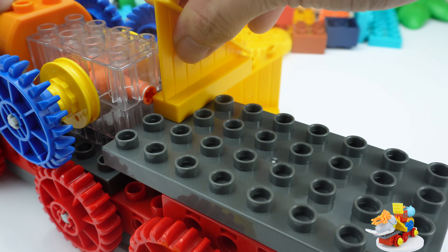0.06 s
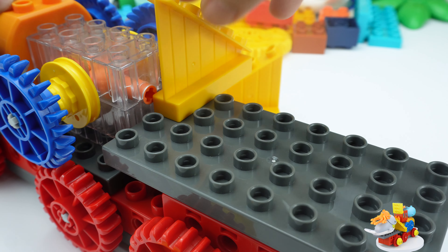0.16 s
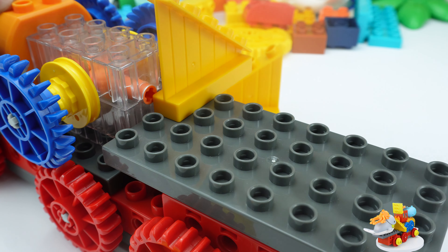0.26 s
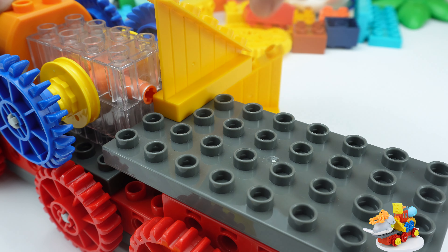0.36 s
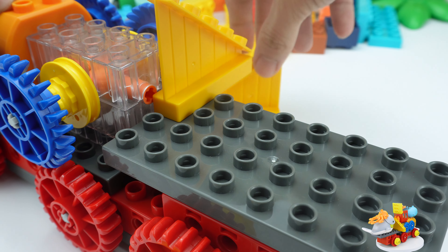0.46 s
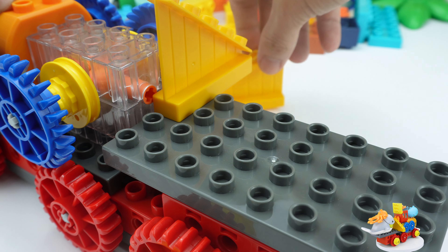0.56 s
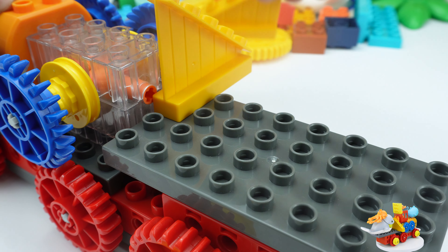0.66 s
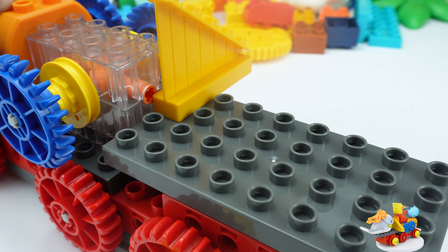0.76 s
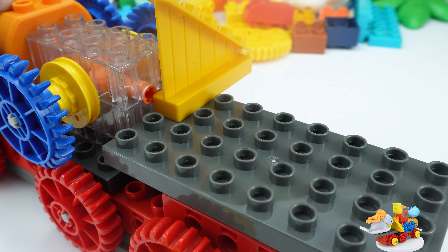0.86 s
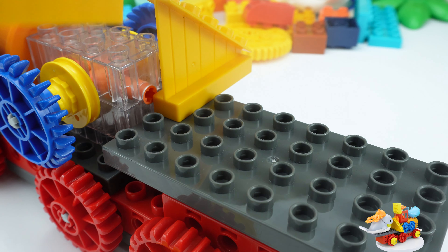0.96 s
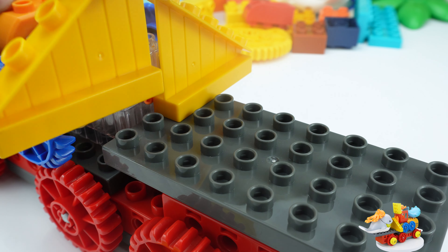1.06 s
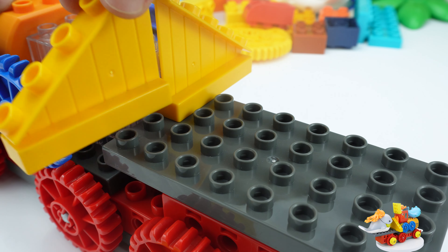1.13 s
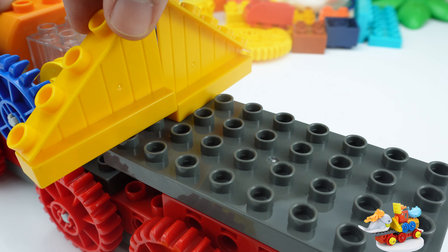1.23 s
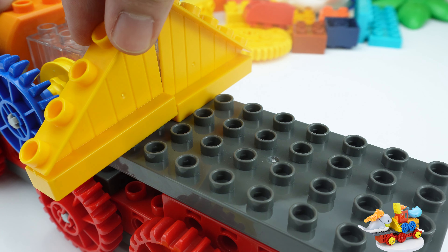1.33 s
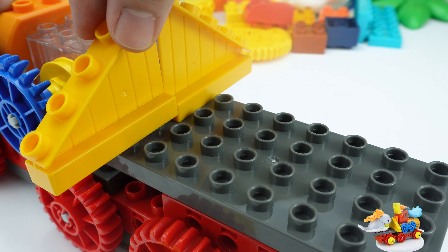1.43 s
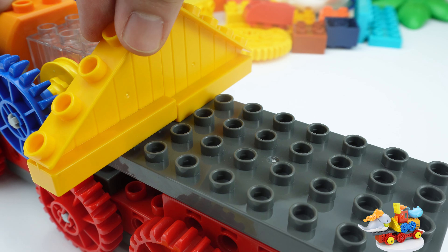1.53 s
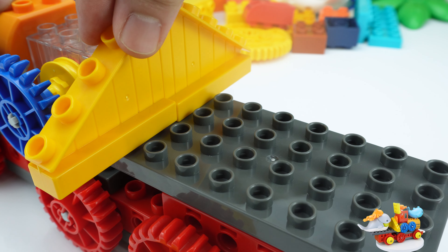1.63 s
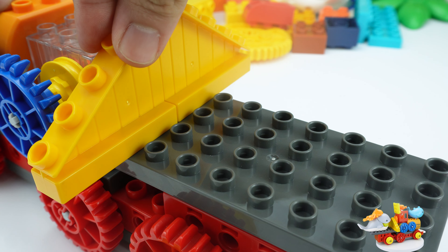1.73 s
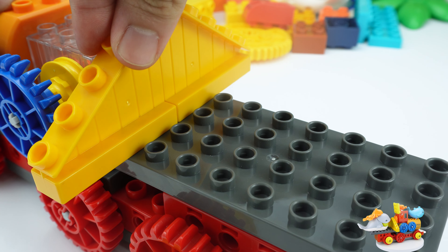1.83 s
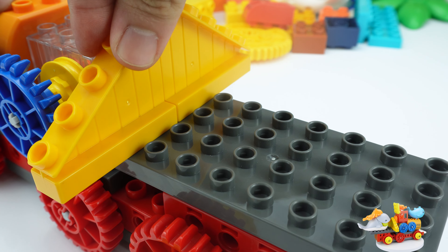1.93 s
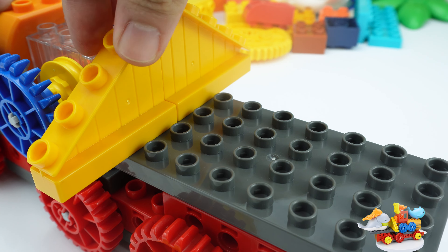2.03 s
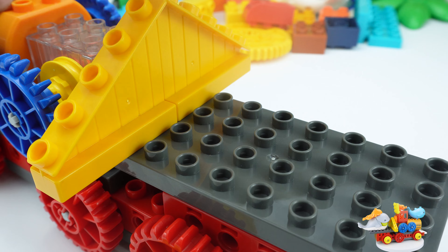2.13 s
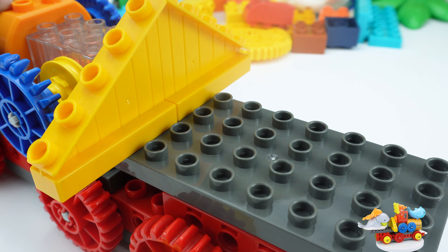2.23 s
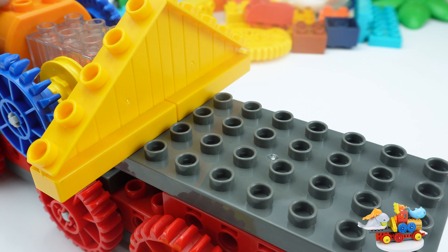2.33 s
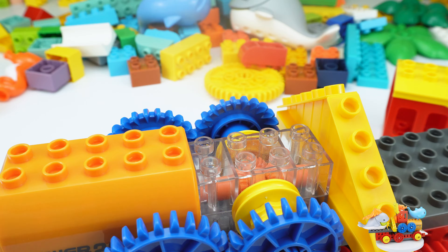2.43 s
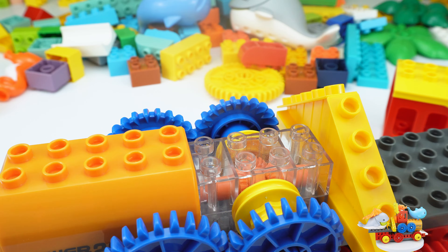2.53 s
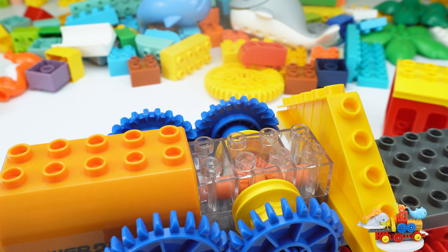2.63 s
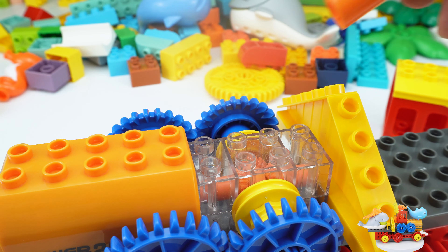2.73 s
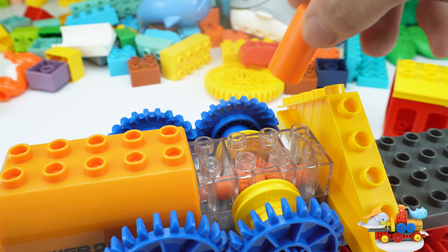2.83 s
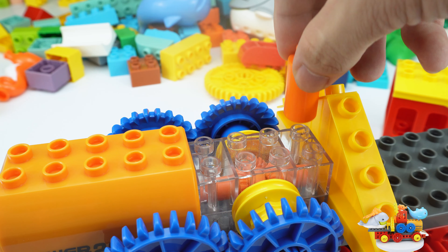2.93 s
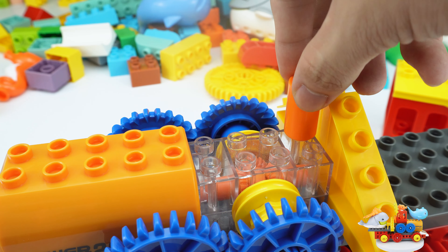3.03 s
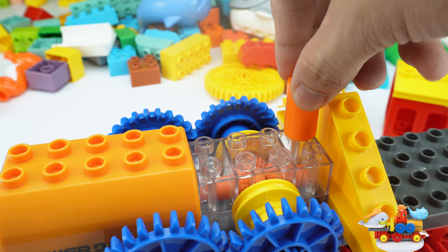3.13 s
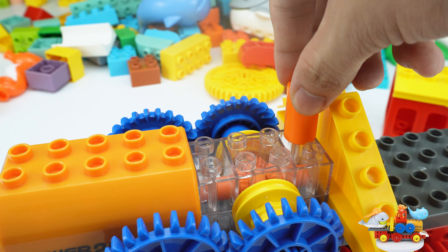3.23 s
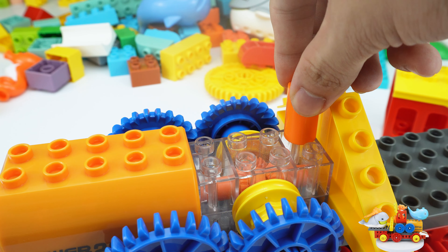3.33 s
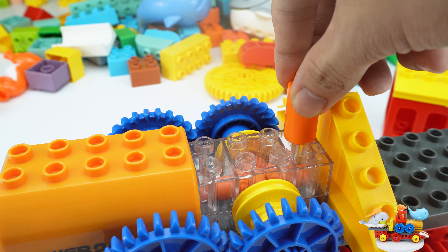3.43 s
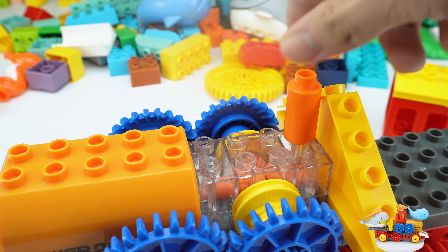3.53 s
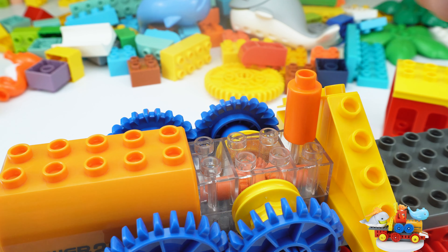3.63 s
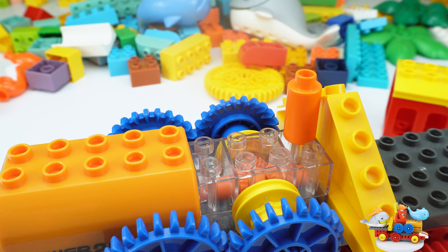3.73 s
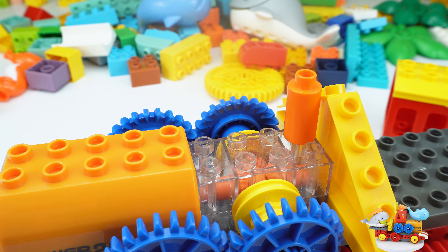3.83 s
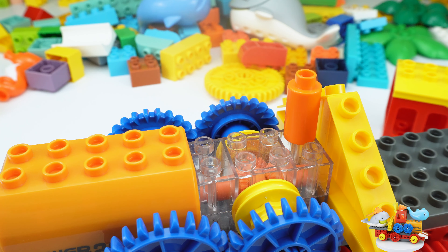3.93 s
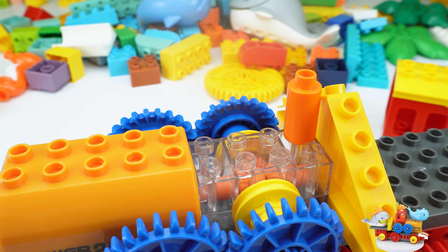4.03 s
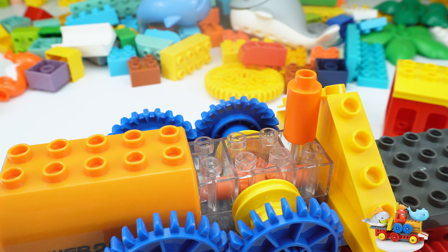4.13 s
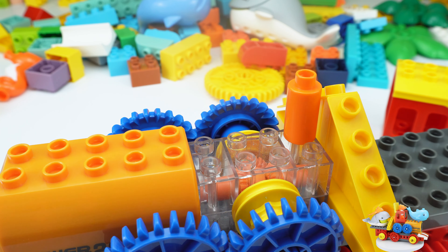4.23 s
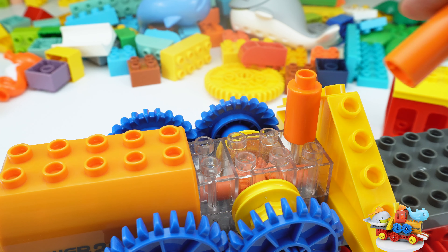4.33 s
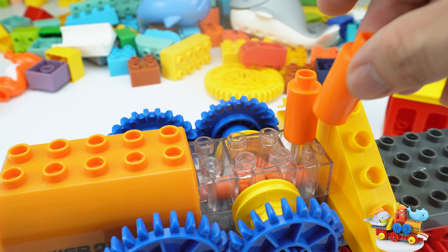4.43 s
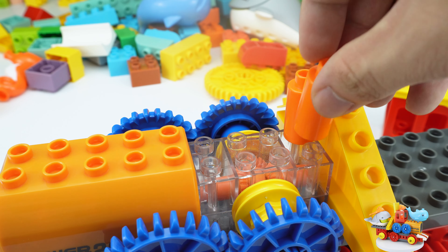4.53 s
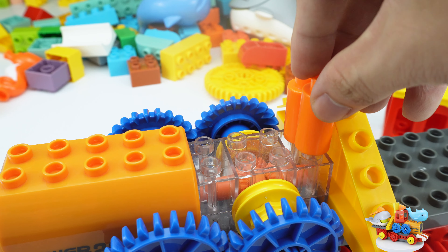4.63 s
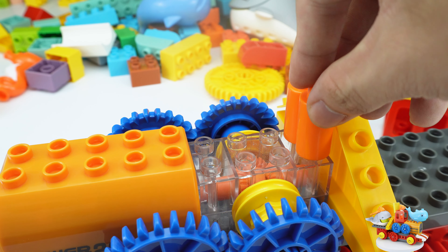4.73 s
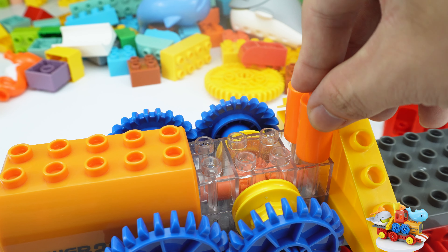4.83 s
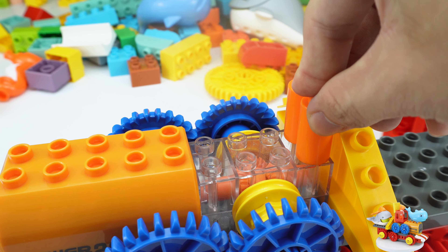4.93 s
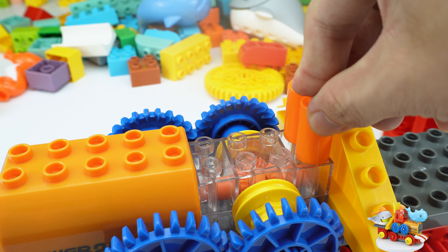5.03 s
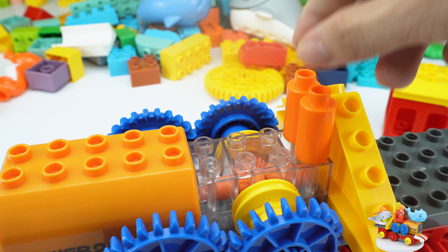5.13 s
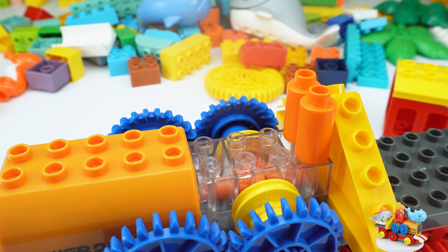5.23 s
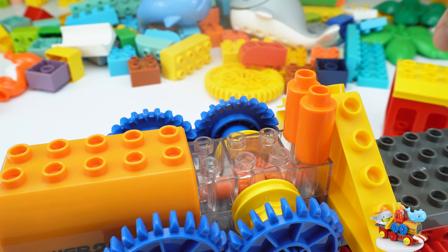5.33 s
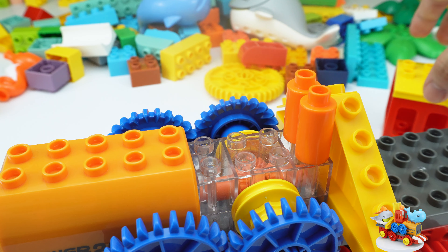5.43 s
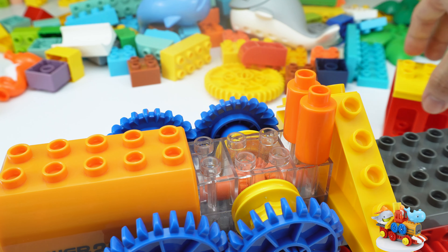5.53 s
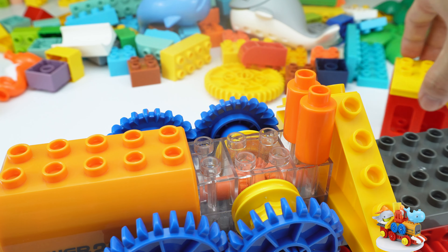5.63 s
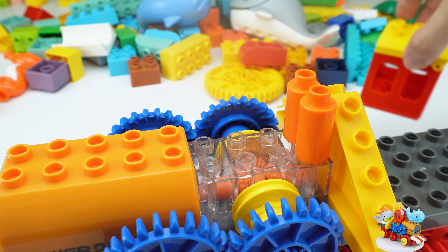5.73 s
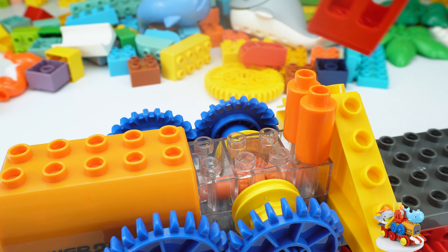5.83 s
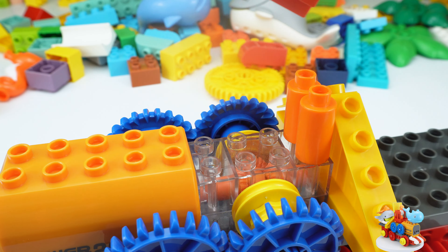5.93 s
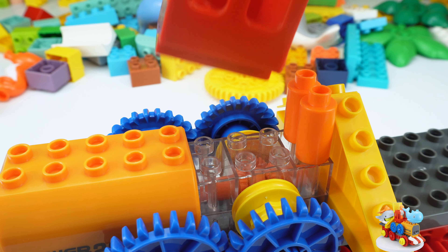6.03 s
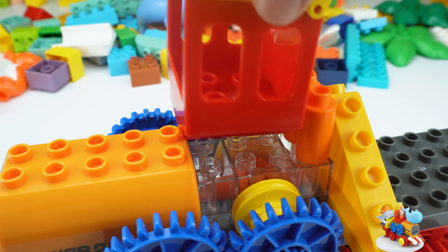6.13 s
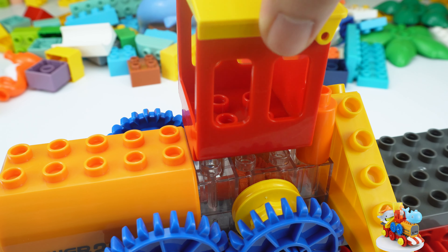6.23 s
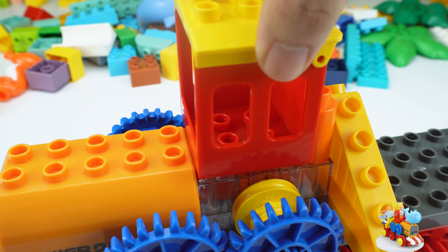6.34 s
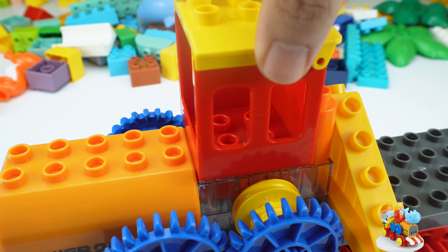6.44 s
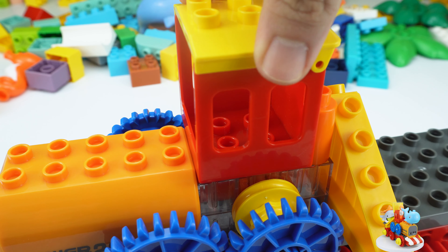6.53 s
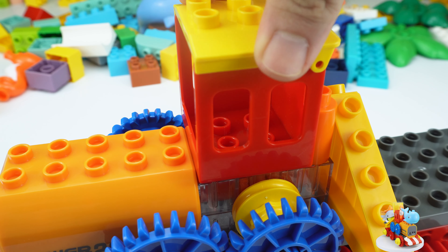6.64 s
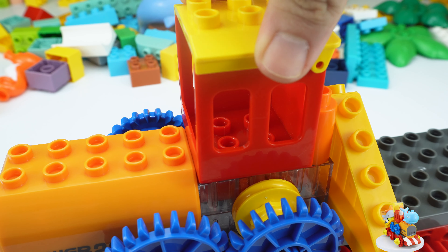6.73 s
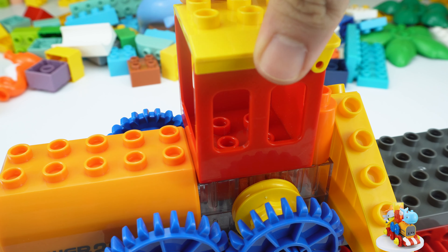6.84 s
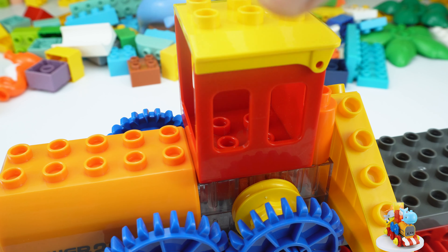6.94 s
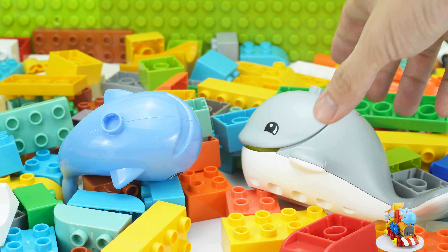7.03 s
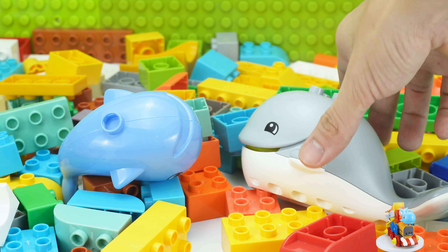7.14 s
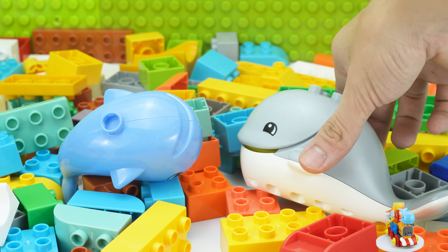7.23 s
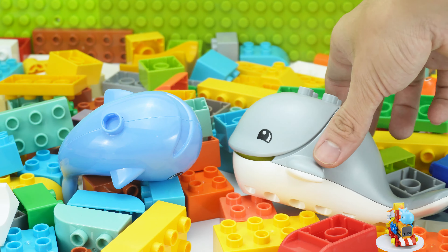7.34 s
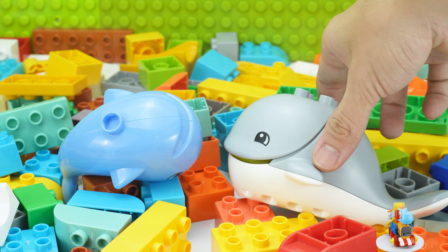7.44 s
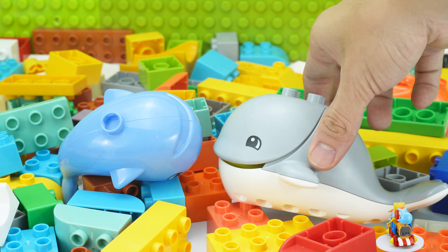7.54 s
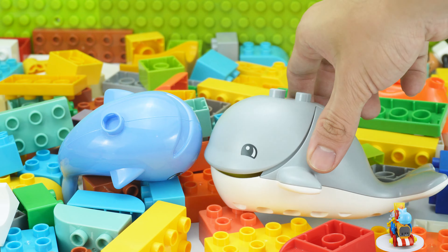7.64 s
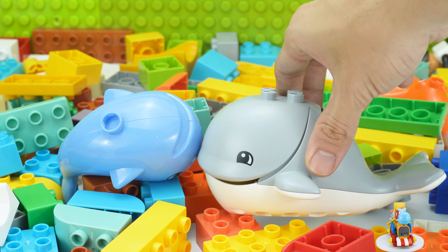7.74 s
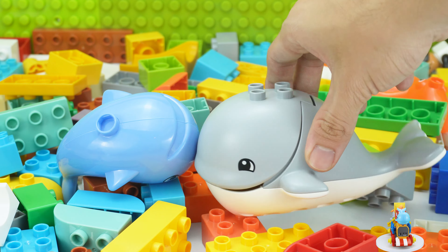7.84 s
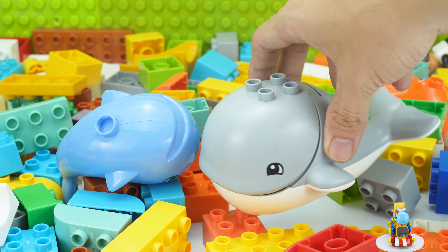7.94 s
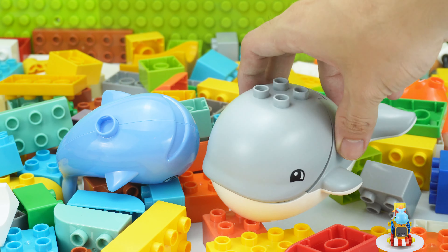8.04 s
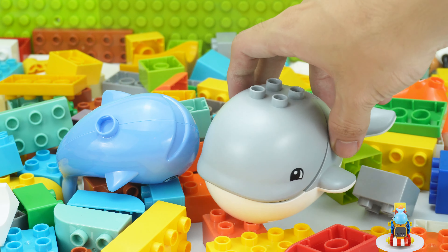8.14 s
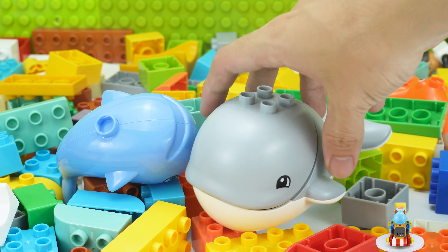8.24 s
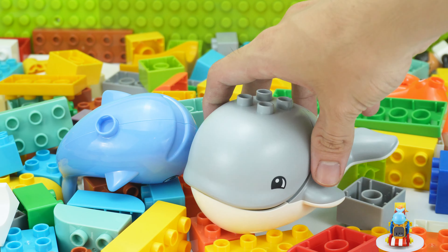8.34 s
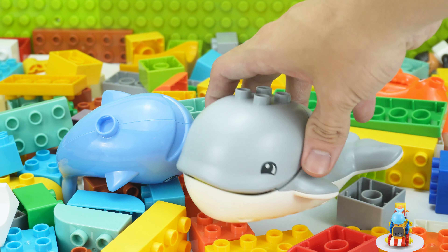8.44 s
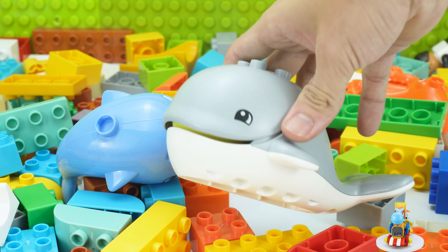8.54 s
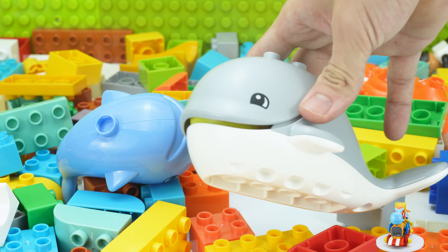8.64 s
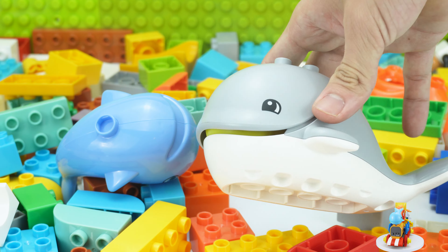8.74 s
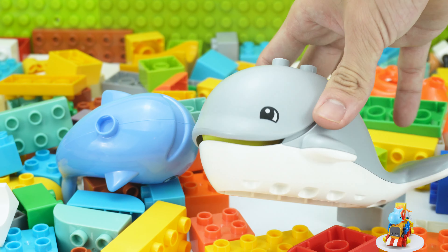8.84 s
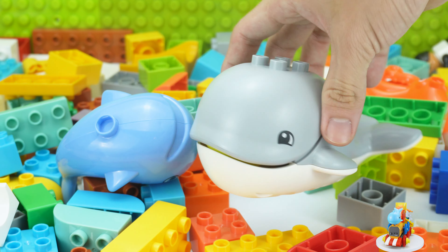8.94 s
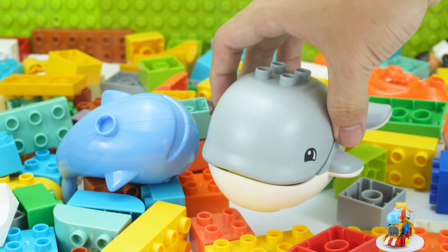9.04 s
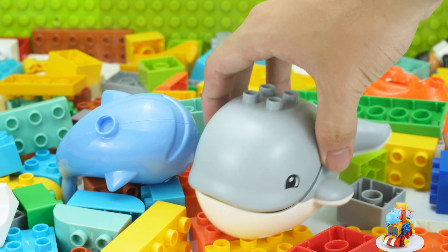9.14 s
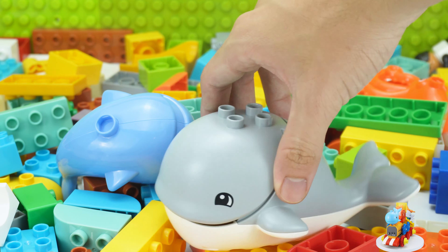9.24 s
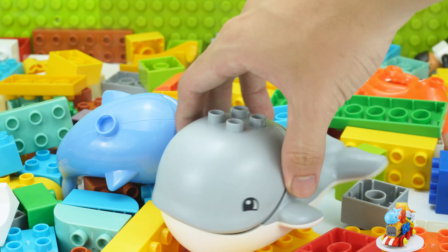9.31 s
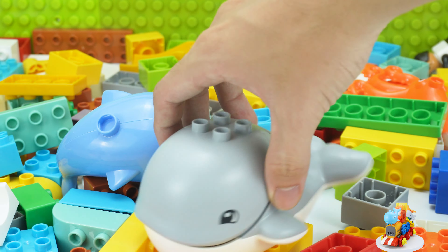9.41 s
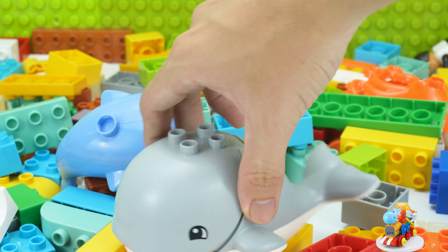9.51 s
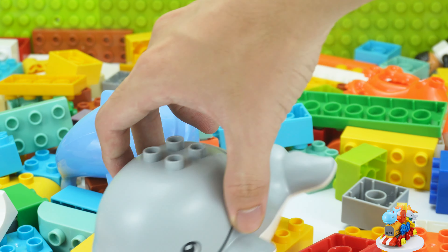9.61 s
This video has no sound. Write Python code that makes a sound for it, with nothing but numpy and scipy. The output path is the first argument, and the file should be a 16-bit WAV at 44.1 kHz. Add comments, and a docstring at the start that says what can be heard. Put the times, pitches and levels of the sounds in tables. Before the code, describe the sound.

Close microphone in a small, damped room with a soft, low ventilation rush. Large hollow plastic blocks are pressed onto one another in separate bursts of hard, bright clicks, some with a dull table thump. A brief high squeak precedes the loudest pair of snaps. Then a hand digs a hollow toy out of a heap of loose blocks, with rattles, scrapes and a final thick clatter.

```python
"""A low ventilation rush is heard first; over it, large hollow plastic blocks are pressed together on a table.
Then a hand digs through a heap of them. Each contact is decaying noise chatter that rings shell, studs, rims and cavity.
Thumps are sums of table modes; slides are filtered gritty noise; drags sing in one narrow mode.
The heap is a run of small knocks through resonances; a small damped room answers, and the loudest clicks clip."""
import sys
import numpy as np
from scipy import signal
from scipy.fft import rfft, irfft, next_fast_len
from scipy.io import wavfile
from scipy.ndimage import uniform_filter1d, map_coordinates

SR = 44100
rng = np.random.default_rng(int(sys.argv[2]) if len(sys.argv) > 2 else 0)


def put_to_file(sound):
    """Save the sound as 16-bit audio at rate SR, in the file named by the first command-line argument."""
    columns = np.atleast_2d(sound).T  # one column per channel
    safe = np.clip(columns, -1, 1)
    whole_steps = np.round(safe * 32767)
    wavfile.write(sys.argv[1], SR, whole_steps.astype(np.int16))


N = 426445
SIZE = 2 ** 14  # samples in a thump or a room tail


def amp(db):
    """Level law: 20 dB is a factor of ten in amplitude."""
    return 10 ** (np.asarray(db) / 20)


def unit(x):
    """Normalisation to an RMS of 1."""
    return x / np.sqrt(np.mean(x ** 2) + 1e-20)


def along(points, hz):
    """Interpolation of (frequency, value) points along a logarithmic frequency axis."""
    f, v = np.transpose(points)
    return np.interp(np.log(hz + 1), np.log(f + 1), v)


def filtered(x, response):
    """Linear filtering: the spectrum is multiplied by a response of frequency."""
    m = next_fast_len(x.shape[-1] + SR // 4)
    spectrum = rfft(x, m) * response(np.fft.rfftfreq(m, 1 / SR))
    return irfft(spectrum, m)[..., :x.shape[-1]]


def modes(resonances):
    """Modal superposition: the causal response of (Hz, width Hz, dB) resonators, alternating in sign."""
    def response(f):
        total = 0
        for k, (hz, width, db) in enumerate(resonances):
            total = total + (-1) ** k * amp(db) * 1j * f * width / (hz * hz - f * f + 1j * f * width)
        return total
    return response


def above(hz):
    """Fourth-order causal high-pass."""
    return lambda f: (1j * f / hz / (1 + 1.2j * f / hz - (f / hz) ** 2) * 1j * f / hz) ** 2


def below(hz):
    """Fourth-order causal low-pass."""
    return lambda f: (1 + 1.4j * f / hz - (f / hz) ** 2) ** -2


def wander(rate):
    """Random modulation: a curve of straight lines between random knots, rate of them a second."""
    knots = rng.standard_normal(int(N * rate / SR) + 4)
    return map_coordinates(knots, [np.arange(N) * rate / SR], order=1)


def gritty(grit_db, rate):
    """Stick-slip roughness: noise whose level wanders as grains catch and let go."""
    return unit(rng.standard_normal(N) * amp(grit_db * wander(rate)))


def strokes(rows, rise, fall):
    """Exponential envelopes: one gain curve per dB column; rows swell, hold and fade (dB per s)."""
    t = np.arange(N) / SR
    gains = 0
    for start, end, *db in rows:
        envelope = amp(-rise * np.maximum(start - t, 0) - fall * np.maximum(t - end, 0))
        gains = gains + np.outer(amp(db), envelope)
    return gains


def another(resonances, shift=0.036):
    """Modal scatter: the grip shifts each mode's pitch and the struck spot sets its strength."""
    scatter = rng.standard_normal((len(resonances), 2))
    return [(hz * (1 + shift * a), width, db + 3 * b)
            for (hz, width, db), (a, b) in zip(resonances, scatter)]


# reverberation of the small room: frequency_hz, t60_s
ROOM_DECAY = [(300, 0.17), (2000, 0.19), (8000, .19), (15000, 0.21)]


def echo(size):
    """Diffuse reverberation: a fresh noise tail of energy 1, each frequency decaying at its own speed."""
    hz, t, z = signal.stft(rng.standard_normal(size), SR, nperseg=256)
    decay = amp(-60 * t / along(ROOM_DECAY, hz)[:, None])
    tail = signal.istft(z * decay, SR, nperseg=256)[1][:size]
    return tail / np.linalg.norm(tail)


def in_room(x, wet_db):
    """Reverberation by convolution: the tail starts 260 samples on, after the first wall."""
    return x + amp(wet_db) * signal.fftconvolve(np.pad(x, (260, 0)), echo(SIZE))[:len(x)]


# spectrum of the ventilation rush: frequency_hz, relative_density_db (per Hz)
RUSH_SPECTRUM = [(20, -16), (55, 2), (93, -5.5), (130, 1.5), (168, -7.5), (248, -2.5), (399, -8),
                 (472, -13), (802, -15), (1960, -28), (8650, -41.5), (12000, -42.5), (16000, -36.5)]
AIR_DB, HUSH_S, HUSH_DB = -55, 7.2, -5  # level; from when it is softer, and by how much


def air():
    """Broadband flow noise: steady random noise shaped to the low spectrum of ventilation."""
    level = amp(AIR_DB + HUSH_DB * (np.arange(N) > HUSH_S * SR))
    return level * unit(filtered(rng.standard_normal(N), lambda f: amp(along(RUSH_SPECTRUM, f))))


# slides of a block or finger on smooth plastic, at full level: start_s, end_s, rub_db, hiss_db
SLIDE_STROKES = [(.603, .632, -41.5, -58), (4.092, 4.098, -60.5, -66), (5.91, 5.99, -71, -44.5),
                 (6.968, 6.972, -70.5, -71.5), (7.37, 7.79, -60.5, -71)]
# spectra of the gritty rub and the smoother hiss: frequency_hz, relative_density_db (per Hz)
RUB_SPECTRUM = [(710, -42.5), (1200, -33), (2010, -1.5), (4400, -14), (7960, -4.5), (15000, -28.5)]
HISS_SPECTRUM = [(1470, -53), (2500, -17.5), (5310, -5.5), (5740, -7.5), (8080, -2.5), (16000, -9)]
# a tight lid rubs free, at full level: start_s, end_s, level_db
LID_SQUEAK = [(5.668, 5.678, -19)]
# resonances of the lid: frequency_hz, width_hz, relative_db
LID_MODES = [(1253, 23, -19), (2290, 40, -8.5), (4230, 930, -13), (5510, 360, -6.5), (6300, 46, 8.5),
             (7300, 610, -11), (9400, 1500, -17.5), (7950, 33000, -27.5)]
SLIDE_RISE, SLIDE_FALL = 800, 420  # dB per s
SQUEAK_RISE, SQUEAK_FALL = 1930, 490  # dB per s


def slides():
    """Sliding friction: rough noise gives a gritty rub and a hiss; the lid squeals in its own modes."""
    rub_gain, hiss_gain = strokes(SLIDE_STROKES, SLIDE_RISE, SLIDE_FALL)
    squeak_gain = strokes(LID_SQUEAK, SQUEAK_RISE, SQUEAK_FALL)[0]
    rub = unit(filtered(gritty(grit_db=3.5, rate=390), lambda f: amp(along(RUB_SPECTRUM, f))))
    hiss = unit(filtered(gritty(grit_db=1.5, rate=200), lambda f: amp(along(HISS_SPECTRUM, f))))
    squeal = unit(filtered(gritty(grit_db=-4.5, rate=140), modes(LID_MODES)))
    return in_room(rub_gain * rub + hiss_gain * hiss + squeak_gain * squeal, wet_db=-11.0)


SNAP_S, CHATTER_S, CHATTER_DB = 0.019, 0.065, -8  # t60 of the first snap; t60 and level of the chatter
CATCH_DB = 2  # how unevenly the surfaces catch
FIRST_TOUCH, FIRST_EDGE = 8, 4  # first impulse: into shell and cavity, into studs and rims


def contact_chatter(t):
    """Impulsive excitation: a first impulse and unevenly decaying noise, one row per part of the block."""
    size = len(t)
    catch = amp(CATCH_DB * np.repeat(rng.standard_normal(size // 32), 32))
    decay = amp(-60 * t / SNAP_S) + amp(CHATTER_DB - 60 * t / CHATTER_S)
    bite = 1 - np.exp(-t / .0002)
    chatter = rng.standard_normal((4, size)) * catch * decay * bite
    chatter[:, 0] = FIRST_TOUCH, FIRST_EDGE, FIRST_EDGE, FIRST_TOUCH
    return chatter


# Resonances of the blocks, before scatter: frequency_hz, width_hz, relative_db
SHELL_MODES = [(1544, 35, -9), (1800, 48, -1), (2170, 45, -5.5), (2466, 98, -0.5), (2793, 64, -5.5),
               (3190, 18, -5.5)]
# shells of the mixed blocks in the heap, damped by what lies on them
LOOSE_SHELL_MODES = [(1442, 340, -14), (2500, 380, -3), (3300, 1300, -8)]
# walls and studs
STUD_MODES = [(3630, 230, -16), (4830, 450, -12), (6690, 140, -13.5), (8270, 530, -13.5), (5340, 3600, -14)]
# thin rims
RIM_MODES = [(8970, 800, -2.5), (14000, 4000, -22)]
# rims of loose blocks, which no neighbour damps
LOOSE_RIM_MODES = [(8700, 450, 3), (13600, 3000, -9.5)]
# air inside the blocks
CAVITY_MODES = [(700, 390, -1), (847, 250, 5), (1270, 510, 3)]


def block_bodies(shell_hz, stud_hz, loose):
    """Modal resonance: shell, studs, rims and cavity, with the contact's own shell and stud rings."""
    if loose:
        shell = another(LOOSE_SHELL_MODES, shift=0.12) + [(shell_hz, 140, 9)]
    else:
        shell = another(SHELL_MODES, shift=0.02) + [(shell_hz, 120, 4)]
    studs = another(STUD_MODES) + [(stud_hz, 210, -0.5)]
    rims = LOOSE_RIM_MODES if loose else RIM_MODES
    return shell, studs, rims, another(CAVITY_MODES)


# contacts: start_s, level_db (peak before the room), shell_hz, stud_hz,
# stud_db (over the shell), cavity_db (over the shell)
CONTACTS = [(0.6222, -3, 3250, 7700, 2.5, -24), (1.2671, -15.5, 2950, 8200, -0.5, -16),
            (1.2697, -3, 1845, 5280, -15, -16.5), (1.322, -7, 1880, 6720, -11.5, -6),
            (1.4035, -5.5, 1850, 5760, -3.5, -22.5), (1.4097, -9, 2980, 5900, -6.5, -18),
            (1.5817, -27.5, 2760, 5640, -5, -37), (1.625, -25, 1320, 5600, -11.5, -25.5),
            (1.667, -18.5, 3010, 6200, -5, -23), (1.7545, -9.5, 1320, 5960, -16, -7),
            (1.7853, -19, 1786, 5280, -6, -31), (2, -47, 2780, 3940, -28.5, -19.5),
            (2.138, -45, 2380, 4880, -2, -26), (3.0219, -3, 2320, 5070, -6, -29),
            (3.036, -12, 3190, 5300, -18, -27.5), (3.1223, -18.5, 1813, 5330, -15.5, -32),
            (3.34, -33.5, 2330, 5620, -25, -21.5), (3.3777, -38, 1614, 6200, -10.5, -10.5),
            (3.579, -51.5, 2616, 4990, -11.5, -21), (4.5839, 0, 1880, 3720, -4.5, -22.5),
            (4.6199, -9.5, 1400, 8300, 0, -12), (4.667, 0, 2325, 5000, -7.5, -24.5),
            (4.78, -11.5, 1650, 5260, -15, -39), (4.98, -25, 1790, 3890, -23.5, -44),
            (5.2062, -36, 2070, 3730, -19.5, -25.5), (6.2719, 4, 1814, 3780, -3, -18.5),
            (6.289, -6, 1940, 3770, -6.5, -20.5), (6.383, 0.5, 1980, 6870, 0.5, -13),
            (6.414, 7, 1980, 4630, 3, -8.5), (6.6346, -43, 1650, 3800, -15.5, 2),
            (7.278, -32.5, 2520, 3820, -16.5, -12.5), (7.308, -34, 2400, 3950, -7, -13),
            (7.3635, -11.5, 1410, 3700, -14, -17), (7.406, -14.5, 2560, 3670, -9.5, -8.5),
            (7.4387, -17, 2510, 3640, -11.5, -19.5), (7.489, -27.5, 2540, 4800, -7.5, -3.5),
            (7.516, -33.5, 1500, 3670, -7, -13), (7.718, -12.5, 1490, 4000, -15, -14.5),
            (7.7595, -16, 2996, 4100, -9, -18), (7.8484, -29, 880, 3720, -11, -15),
            (7.863, -29, 3000, 4540, -3, -2), (7.9572, 0, 3230, 4400, -5.5, -20.5),
            (7.9964, -10.5, 2500, 4050, -16, -9), (8.0324, -10, 3590, 3800, -7.5, -12),
            (8.0628, -12.5, 3270, 3820, -3.5, -14), (8.117, -11.5, 880, 4300, -16, -3),
            (8.138, -9, 900, 4070, -5, -3), (8.152, -12, 2060, 3630, -13, -10),
            (8.2369, -19.5, 1520, 3600, -2.5, -3.5), (8.246, -17, 2650, 3620, -10, -15.5),
            (8.2957, -15, 2650, 4030, 2, 9.5), (8.3394, -3, 3540, 6650, -3.5, -21),
            (8.362, -14.5, 3300, 3650, -9, -10), (8.388, -11.5, 3400, 6600, -6, -22),
            (8.3935, -10, 3080, 3580, -13, -27), (8.4195, -11.5, 3570, 6600, -8, -25),
            (8.426, -12.5, 3200, 3620, -8, -23), (8.432, -31, 3400, 3720, -8, -19),
            (8.443, -12.5, 3500, 3070, -13, -23.5), (8.644, -15, 3126, 4280, -15, -11.5),
            (9.1707, -8, 2714, 3650, -4, -14.5), (9.233, -16.5, 2677, 3820, -7.5, -35),
            (9.279, -2.5, 1536, 5430, -1, -6.5), (9.2895, -7.5, 3030, 5640, -6, -12),
            (9.303, -10, 2780, 3800, -9, -25), (9.33, -14, 1430, 3770, -12, -7),
            (9.365, -3.5, 2830, 4150, -11, -6), (9.3699, -2.5, 1384, 4150, -4, -10),
            (9.389, 4, 2505, 5650, -4, -7.5), (9.415, -6, 2880, 4100, -6, -32),
            (9.46, -2.5, 3000, 4850, -7, -23), (9.5, -7.5, 2840, 5100, -4, -10),
            (9.507, -4, 1510, 6820, -1.5, -21), (9.52, -12.5, 1480, 6930, -8, -2),
            (9.5395, -7, 1400, 3830, -6, -11), (9.5552, -8.5, 2330, 3620, -3, -22),
            (9.603, -21, 2617, 3640, -5, -2.5), (9.654, -21, 3200, 8400, -6, 4),
            (9.664, -12, 1490, 3220, -15.5, -15)]
# the rims crack under the studs, more so as the contact gets brighter (dB per stud dB) and harder (per dB)
CRACK_DB, CRACK_GROWS, CRACK_HARD = -12, 1, .25


def clicks():
    """Source-filter principle: each contact's chatter drives the modes of the block, then the room."""
    size = SIZE // 2
    out, t, f = np.zeros(N + size), np.arange(size) / SR, np.fft.rfftfreq(size, 1 / SR)
    bands = [above(hz=620)(f) * below(hz=4500)(f),  # shell
             above(hz=2500)(f) * below(hz=9000)(f),  # studs
             above(hz=7000)(f),  # rims
             above(hz=300)(f) * below(hz=1500)(f)]  # cavity
    for s, db, shell_hz, stud_hz, stud_db, cavity_db in CONTACTS:
        chatter = contact_chatter(t)
        loose = s > HEAP_STROKES[0][0] - .1  # blocks lie loose once the digging begins
        bodies = block_bodies(shell_hz, stud_hz, loose)
        paths = np.array([modes(body)(f) for body in bodies]) * bands
        rings = irfft(rfft(chatter) * paths, size)
        crack_db = CRACK_DB + CRACK_GROWS * stud_db + CRACK_HARD * db
        sizes = amp([0, stud_db, crack_db, cavity_db])
        blow = (sizes / np.linalg.norm(rings, axis=1)) @ rings
        # the walls hear the block from every side, so its rings blur in the tail
        path_power = np.abs(paths) ** 2
        power = sizes ** 2 @ (path_power / np.mean(path_power, axis=1, keepdims=True))
        blurred = np.exp(uniform_filter1d(np.log(power + 1e-9), size=100) / 2)
        blurred = blurred / (1 + f / 9000)  # soft furnishings take the treble first
        tail = np.roll(irfft(rfft(echo(size)) * blurred, size), 300)
        out[round(s * SR):][:size] += amp(db) / np.abs(blow).max() * (blow + amp(-4.0) * tail)
    return out[:N]


# modes of the table top: frequency_hz, t60_s
TABLE_MODES = [(33, 0.45), (65, 1), (89, 0.15), (103, 0.63), (150, 0.53), (181, 0.16), (215, 0.24),
               (280, .26), (325, .26), (378, 0.25), (590, 0.045)]
# thumps into the table top: start_s, level_db, spot_hz (pitch that the struck spot favours)
TABLE_THUMPS = [(1.324, -35, 88), (1.422, -28.5, 83.4), (1.753, -27, 181), (1.757, -17.5, 590),
                (1.769, -23, 88), (4.813, -41.5, 33), (4.981, -37.5, 378), (6.271, -25, 378),
                (6.391, -28.5, 103), (6.416, -30.5, 325), (6.689, -45, 378), (8.141, -21.5, 155.7),
                (8.136, -20, 265), (8.137, -27, 74), (8.303, -35.5, 323), (8.649, -38, 88.8),
                (9.284, -21.5, 110.2), (9.28, -19.5, 300), (9.367, -25.5, 150), (9.371, -26, 215.3),
                (8.644, -31.5, 240.5), (9.422, -31.5, 102), (9.497, -33, 325)]
SPOT_DB_PER_OCTAVE, RISE_CYCLES = 51, 0.24  # how fast other modes drop out; how softly a mode starts


def table():
    """Modal excitation: a thump sets going the table modes its spot favours, their pitch a little unsteady."""
    out, t = np.zeros(N + SIZE), np.arange(SIZE) / SR
    hz, t60 = np.transpose(TABLE_MODES)[:, :, None]
    cycles = hz * t / RISE_CYCLES
    life = amp(-60 * t / t60) * (1 - np.exp(-cycles))
    push = 2.3 * cycles * (1 - cycles / 2) * np.exp(-cycles)  # the top gives way and springs back
    for s, db, spot_hz in TABLE_THUMPS:
        drift = .03 * np.cumsum(rng.standard_normal(SIZE))  # phase, radians
        share = amp(db - SPOT_DB_PER_OCTAVE * np.abs(np.log2(hz / spot_hz)))
        ring = life * np.sin(2 * np.pi * hz * t + drift)
        out[round(s * SR):][:SIZE] += np.sum(share * (ring + push), axis=0)
    return out[:N]


# a block dragged along another sings, at full level: start_s, end_s, level_db, pitch_hz
SINGING_DRAGS = [(2.133, 2.15, -60, 4900), (8.391, 8.45, -20.5, 3520), (8.578, 8.614, -41, 1430),
                 (9.307, 9.321, -28, 3770), (9.31, 9.327, -29, 1535), (9.416, 9.431, -26, 4200),
                 (9.539, 9.58, -25, 3840), (9.601, 9.618, -36, 3890), (9.647, 9.693, -30, 1520),
                 (9.656, 9.66, -27, 3310)]
SING_WIDTH, SING_RISE, SING_FALL = 0.078, 2000, 2500  # width over pitch; dB per s


def sings():
    """Friction-driven resonance: uneven friction noise drives one narrow mode while the drag lasts."""
    out, t = np.zeros(N + SIZE), np.arange(SIZE // 2) / SR
    for start, end, db, hz in SINGING_DRAGS:
        s = start - .03 + t  # leaves time for the swell
        catch = amp(5.3 * np.repeat(rng.standard_normal(len(t) // 128), 128))
        drag = rng.standard_normal(len(t)) * catch
        mode = modes([(hz, SING_WIDTH * hz, 0)])
        tone = unit(filtered(drag, lambda f: mode(f) ** 2))
        level_db = db - SING_RISE * np.maximum(start - s, 0) - SING_FALL * np.maximum(s - end, 0)
        out[round(s[0] * SR):][:len(t)] += tone * amp(level_db)
    return in_room(out[:N], wet_db=-14.5)


def jostle(resonances, edge, pressure):
    """Modulated resonance: all modes feel the knocks at changing strengths, so the colour keeps changing."""
    total = 0
    for mode in resonances:
        drive = pressure * gritty(grit_db=2.5, rate=360) * amp(2.1 * wander(rate=25))
        total = total + filtered(drive, lambda f: modes([mode])(f) * edge(f))
    return unit(total)


# handfuls of loose blocks grinding in the heap, at full level: start_s, end_s, hollow_db, wall_db
HEAP_STROKES = [(7.29, 7.335, -38.5, -51), (7.385, 7.395, -33, -34.5), (7.46, 7.8, -51.5, -54.5),
                (7.947, 7.955, -41, -41), (7.99, 8.1, -36.5, -42), (8.25, 8.27, -39, -62),
                (8.305, 8.32, -20.5, -18.5), (8.35, 8.45, -39, -30.5), (8.49, 8.56, -55.5, -56),
                (8.57, 8.62, -48, -51.5), (9.24, 9.25, -39.5, -37), (9.305, 9.315, -23, -28),
                (9.368, 9.43, -26.5, -25), (9.505, 9.52, -19.5, -25.5), (9.55, 9.57, -26.5, -25),
                (9.64, 9.7, -31.5, -34)]
# resonances of the hollows, then of the walls: frequency_hz, width_hz, relative_db
HOLLOW_MODES = [(770, 120, -7), (1433, 100, -5), (2500, 1000, -5)]
WALL_MODES = [(2980, 290, 9), (3670, 120, 12.5), (6340, 300, -11), (5560, 3400, -14)]
HEAP_RISE, HEAP_FALL = 2100, 990  # dB per s
# single knocks: rate, size scatter, t60, level over the grinding
KNOCKS_PER_S, KNOCK_SPREAD_DB, KNOCK_S, KNOCK_DB = 240, 3.5, 0.013, -4


def heap():
    """Random impact superposition: many small knocks run together and ring hollows and walls."""
    hollow_gain, wall_gain = strokes(HEAP_STROKES, HEAP_RISE, HEAP_FALL)
    starts = (rng.random(N) < KNOCKS_PER_S / SR) * amp(KNOCK_SPREAD_DB * rng.standard_exponential(N))
    decay = amp(-60 * np.arange(SIZE) / SR / KNOCK_S)
    knocks = unit(signal.fftconvolve(starts, decay)[:N])
    pressure = unit(1 + amp(KNOCK_DB) * knocks)
    hollow = jostle(HOLLOW_MODES, lambda f: above(hz=450)(f) * below(hz=4500)(f), pressure)
    wall = jostle(WALL_MODES, above(hz=1501.4), pressure)
    return in_room(hollow_gain * hollow + wall_gain * wall, wet_db=-11.5)


def scene():
    """Linear superposition of all sources, as one channel."""
    return (air() + slides() + clicks() + table() + sings() + heap())[None]


def record(dry):
    """Saturation and band limiting: the converter clips at full scale and keeps nothing above its limit."""
    clipped = dry / (1 + np.abs(dry) ** 8) ** (1 / 8)
    # the response falls from 1 at 15550 Hz to 0 at 15950 Hz
    return filtered(clipped, lambda hz: np.clip((15950 - hz) / 400, 0, 1) ** 2)


dry = scene()
out = record(dry)
put_to_file(out)
```